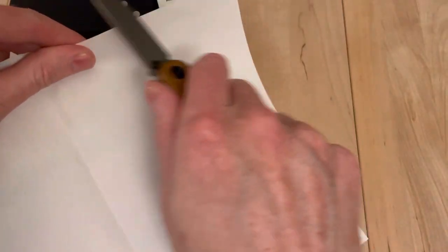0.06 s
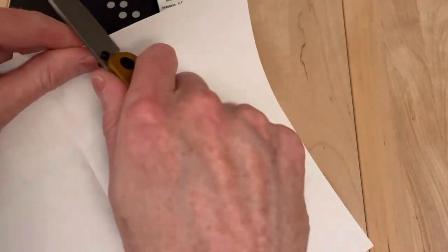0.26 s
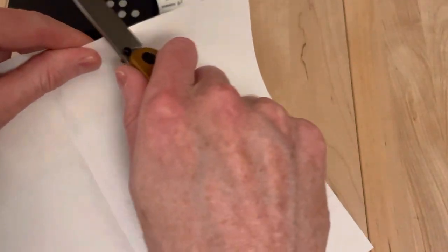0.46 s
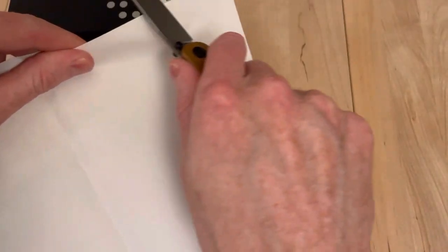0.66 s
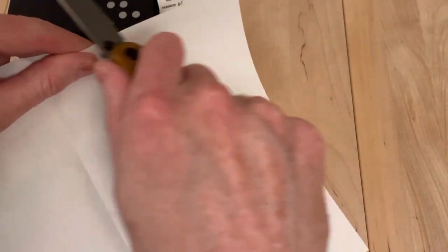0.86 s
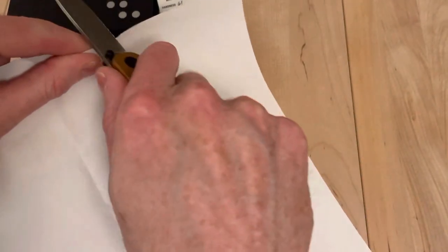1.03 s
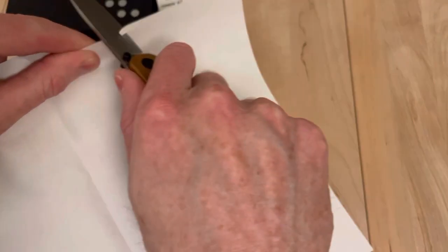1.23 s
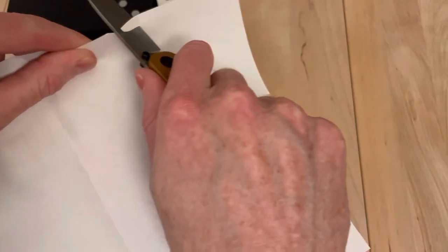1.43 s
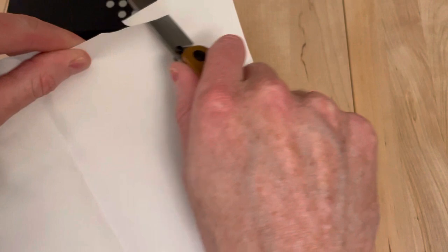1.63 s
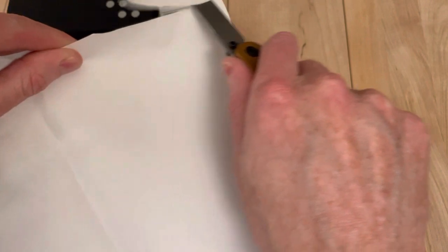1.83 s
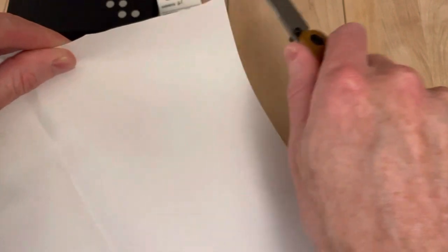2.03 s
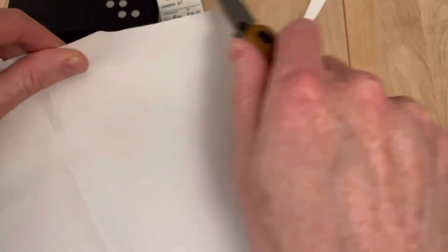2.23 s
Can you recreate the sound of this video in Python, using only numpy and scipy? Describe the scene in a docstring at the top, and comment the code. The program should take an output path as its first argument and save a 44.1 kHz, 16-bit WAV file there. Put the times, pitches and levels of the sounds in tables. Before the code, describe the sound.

A knife cuts a sheet of paper, close-miked in a small room. A crisp snap at once, then faint sliding and small rasps; a dry scraping cut from 0.4 to 0.7 seconds ends in a snap. Soft rustling and catches near 1.05 lead to a longer cut from 1.15, growing louder and brighter until sharp snaps at 1.89. Quiet sliding follows, with a last snap at 2.28. Low handling rumbles beneath.

```python
"""Close by, a hand-held sheet of paper snaps over a wooden table, then slides softly and rasps on a knife blade.
The blade drags one long cut, a snap ends it, and after slides and rasps it drags a longer, louder cut.
That ends in rasps and snaps; the sheet slides on to a last snap. Handling rumbles and pushes lie beneath.
Friction is shaped noise, snaps are struck resonances, rumble is low noise and pushes are sagging tones.
A small room answers the paper, and two microphone ports hear it out of step."""
import sys
import numpy as np
from scipy import signal
from scipy.fft import rfft, irfft, next_fast_len
from scipy.io import wavfile
from scipy.ndimage import uniform_filter1d, map_coordinates

SR = 44100
rng = np.random.default_rng(int(sys.argv[2]) if len(sys.argv) > 2 else 0)


def pcm_store(signal):
    """Save signal as 16-bit PCM."""
    levels = np.round(np.clip(np.atleast_2d(signal), -1, 1) * 32767)
    wavfile.write(sys.argv[1], SR, levels.astype(np.int16).T)


N = 100724

RISE_S = 0.00061  # linear onset of rubbing and rasps, s


def amp(db):
    """Level to amplitude: 20 dB is a factor of ten."""
    return 10 ** (np.asarray(db) / 20)


def unit(x):
    """Normalisation to an rms amplitude of 1."""
    return x / np.sqrt(np.mean(x ** 2) + 1e-20)


def along(points, hz):
    """Linear interpolation of (f/Hz, value) points on a logarithmic frequency axis."""
    f, v = np.transpose(points)
    return np.interp(np.log(hz + 1), np.log(f + 1), v)


def wobble(rate):
    """Slow random modulation: a smooth curve through rate random knots a second."""
    knots = rng.standard_normal(int(N * rate / SR) + 4)
    return map_coordinates(knots, [np.arange(N) * rate / SR])


def filtered(x, response):
    """Linear filtering: the spectrum of x times a complex frequency response."""
    m = next_fast_len(x.shape[-1] + 8192)
    spectrum = rfft(x, m) * response(np.fft.rfftfreq(m, 1 / SR))
    return irfft(spectrum, m)[..., :x.shape[-1]]


def peak(f, hz, width_hz):
    """Response of one damped, causal resonance, with gain 1 at its pitch."""
    return 1j * f * width_hz / (hz * hz - f * f + 1j * f * width_hz)


def patchy(x, depth_db, size, wide, long):
    """Random time-frequency modulation: a gain field smoothed over wide bins by long frames."""
    z = signal.stft(x, nperseg=size)[2]
    field = uniform_filter1d(rng.standard_normal(z.shape), size=wide, axis=0)
    field = uniform_filter1d(field, size=long, axis=1)
    return signal.istft(z * amp(depth_db * unit(field)), nperseg=size)[1][:N]


def thumps():
    """Handling as low-passed noise: hands on table and sheet, strongly correlated between the ports."""
    # handling level over time: t/s, level/dB
    handling = [(0.0, -48), (0.1, -59), (0.17, -71.5), (0.28, -66), (0.31, -49.5), (0.56, -52),
                (0.61, -56.5), (0.78, -57), (0.88, -79), (1.0, -70), (1.05, -49.5), (1.21, -55.5),
                (1.45, -62), (1.5, -58), (1.56, -71), (1.58, -53), (1.75, -94), (1.91, -51), (1.94, -53),
                (1.98, -55), (2.05, -65.5), (2.14, -69), (2.25, -65.5), (2.28, -58)]
    # spectral shape of the rumble: f/Hz, density/dB
    rumble = [(25, -38), (40, -10), (60, 0.5), (90, 1.5), (130, -8), (200, -6.5), (400, -7.5), (700, -41.5)]
    side_share, lumps_db, lumps_per_s = 0.35, 1, 26.2
    s, db = np.transpose(handling)
    mid, side = filtered(rng.standard_normal((2, N)), lambda f: amp(along(rumble, f)))
    pair = np.array([mid + side_share * side, mid - side_share * side])
    pair = unit(pair * amp(lumps_db * wobble(lumps_per_s)))
    return amp(np.interp(np.arange(N) / SR, s, db)) * pair


def pushes():
    """Soft pushes of the hand on sheet and table: gliding sinusoids under a raised-cosine swell."""
    # one push a row: centre t/s, length/s, peak level/dB, f/Hz at the centre
    push_table = [(.33, 0.045, -44, 90), (.775, 0.042, -49, 70), (1.052, 0.026, -40.5, 110),
                  (1.075, .05, -50, 65), (1.5, 0.043, -50.5, 80), (1.86, 0.025, -36, 230),
                  (1.896, .025, -37.5, 184), (1.922, 0.023, -39.5, 110), (1.98, 0.038, -41.5, 92),
                  (2.015, 0.027, -48.5, 100)]
    sag = 0.36  # fall in pitch from start to end, as a share of the centre pitch
    t, out = np.arange(N) / SR, np.zeros(N)
    for s, length, db, hz in push_table:
        u = np.clip((t - s) / length, -.5, .5)  # place within the push; the swell is zero at both ends
        turns = hz * length * (u - sag * u * u / 2) + rng.random()
        out += amp(db) * np.cos(np.pi * u) ** 2 * np.sin(2 * np.pi * turns)
    return out


def tail(t60s, seconds):
    """Diffuse reverberation: noise of energy 1 whose decay time depends on frequency."""
    hz, t, z = signal.stft(rng.standard_normal(int(SR * seconds)), SR, nperseg=128)
    decay = amp(-60 * t / along(t60s, hz)[:, None])
    h = signal.istft(z * decay, SR, nperseg=128)[1]
    return h / np.linalg.norm(h)


def room(paper):
    """Room response as convolution of the paper's sound with a delayed diffuse tail."""
    # reverberation time: f/Hz, t60/s
    decay_times = [(200, 0.41), (2000, 0.19), (10000, 0.24)]
    level_db, delay = -17, 300  # delay in samples
    return amp(level_db) * signal.fftconvolve(np.pad(paper, (delay, 0)), tail(decay_times, .4))[:N]


def sheet(f):
    """Radiation colour of the paper: a broad spectrum with the sheet's resonances and dips."""
    # broad spectrum of rubbed paper: f/Hz, density/dB
    colour = [(150, -19.5), (350, -10.5), (550, -4.5), (800, 4), (1300, 0), (2000, -2), (2350, -2),
              (2700, -8), (3100, -6), (4000, -9), (5000, -9), (6500, -10), (7700, -11.5), (10000, -15),
              (12000, -18.5), (14500, -13.5), (15800, -45)]
    # resonances of the sheet: f/Hz, width/Hz, level/dB (negative = dip)
    rings = [(821, 150, 3), (1360, 88, 1), (1730, 270, 1), (2270, 160, 2.5), (2294, 90, -14),
             (3027, 117, -9), (3840, 180, 3.5), (4290, 43, 7.5)]
    ringing = sum(db * np.abs(peak(f, hz, width)) ** 2 for hz, width, db in rings)
    return amp(along(colour, f) + ringing)


def fibres():
    """Friction noise: random fibre tears over smooth rubbing, in four bands; the two bodies sum to rms 1."""
    tears_per_s, spread_db, smooth_share = 9000, 1, 0.45  # smooth_share of the power
    chatter_db, patchy_db, streaks_db = 0.5, 1.78, 2.5
    low_hz, bite_hz, treble_hz = 1190, 3060, 6900  # band edges

    tears = (rng.random(N) < tears_per_s / SR) * rng.standard_normal(N)
    tears = tears * amp(spread_db * rng.standard_normal(N))
    smooth = rng.standard_normal(N)
    rub = np.sqrt(1 - smooth_share) * unit(tears) + np.sqrt(smooth_share) * smooth
    rub = patchy(rub, patchy_db, 256, 4, 8)
    rub = patchy(rub, streaks_db, 1024, 3, 12)
    rub = rub * amp(chatter_db * wobble(90))

    def split(f):
        lowpasses = [1 / (1 + (f / hz) ** 8) for hz in (low_hz, bite_hz, treble_hz)]
        # neighbouring low-passes differ by one band: low body, body, bite, treble
        return np.diff([0 * f] + lowpasses + [0 * f + 1], axis=0)

    bands = filtered(rub, lambda f: sheet(f) * split(f))
    return bands / (bands[0] + bands[1]).std()


def rubbing(strokes):
    """Continuous friction: steady fibre noise modulated by each stroke's level and colour."""
    t, gains = np.arange(N) / SR, np.zeros((4, N))
    for rows in strokes:
        s, level, low, bite, treble = np.transpose(rows)
        on = np.clip(np.minimum(t - s[0], s[-1] - t) / RISE_S + 1, 0, 1)
        gains += on * amp([np.interp(t, s, level + over) for over in (low, 0 * s, bite, treble)])
    return (gains * fibres()).sum(axis=0)


def slides():
    """Sliding friction of the sheet between the strokes of the blade."""
    # one list a slide: t/s, body level/dB, then low body/dB, bite/dB, treble/dB over that level
    slide_table = [
        [(0, -38, 5, 1, 1), (.012, -49.5, -6, -9, 4), (.025, -56, 8, -15, 0)],
        [(.05, -58.5, 9, 9, -2), (.13, -57, -8, 0.5, -1), (.2, -58.5, -6.5, -1.5, 0.5), (.245, -61, -5, -2, -1),
         (.262, -78, 5, 4, -7), (.284, -74, -3, -8, 0)],
        [(.29, -48.5, 2.5, 4, -1), (.342, -47.5, 3.5, 4.5, 1), (.405, -46, 5.5, 4, 0), (.425, -56, 9, -2, 5)],
        [(.71, -54, 6, 8, 6), (.77, -63, 11.5, 6.5, -3), (.83, -55.5, -11, -3.5, -3),
         (.91, -57.5, -12, 0.5, 0.5), (.97, -62, -3, -4, -3), (.995, -70, -8, -4, 0), (1.02, -84, -1, -3, -6)],
        [(1.03, -53, -9, -25, -3), (1.08, -54.5, 1, 9, 6), (1.14, -55, 10, 2, 10)],
        [(1.9, -41.5, 15, -1, -18), (1.93, -46.5, -4, 6, -11), (1.97, -53, 9, 5.5, -15),
         (2.03, -52.5, -20, -1.5, -13), (2.1, -64, 2, 2.5, 5.5), (2.15, -52.5, -5, 0, 8),
         (2.21, -53, -1.5, 7, 10), (2.278, -49.5, -13, 0.5, -7)],
    ]
    return rubbing(slide_table)


def snaps():
    """Impulsive release of the sheet: a blow and dying crackle excite resonances, with a bright crack."""
    # one snap a row: t/s, peak level of the body/dB, body f/Hz, crackle t60/s,
    # bite of the crack/dB before crack_db, thud/dB re body, thud f/Hz
    snap_table = [(0.0263, -27.5, 1390, 0.021, -21, 0.5, 780), (0.0341, -15.5, 1990, 0.033, -15, -10, 970),
                  (.0362, -14, 1810, 0.029, -4, -17, 402), (.0395, -24, 1004, 0.033, -17, -7.5, 490),
                  (.7174, -14.5, 1430, 0.012, -18, -7.5, 990), (.7195, -25.5, 1800, 0.043, -12, -3, 900),
                  (0.7378, -23, 2020, 0.041, -14, -8, 586), (0.742, -27.5, 1320, 0.041, -26, -5, 586),
                  (1.0242, -25, 760, 0.042, -1.5, -14.5, 350), (1.8876, -14, 1490, 0.01, 5, -20, 614),
                  (1.8928, -13, 1310, 0.029, 15, -7, 790), (1.8947, -8.5, 1390, 0.021, 7.5, -19.5, 437),
                  (1.949, -17.5, 1740, 0.038, -14, -18, 990), (2.2805, -11.5, 1880, 0.055, 8, -3, 840)]
    body_width, thud_width = 0.34, 0.77  # resonance width as a share of pitch
    crack_db, blow = -8, 10.2  # blow: height of the impulse against the crackle
    out, t = np.zeros(N + SR), np.arange(SR // 8) / SR
    for s, db, hz, t60, bite_db, thud_db, thud_hz in snap_table:
        decay = amp(-60 * t / t60) * np.clip(t / 0.0003, 0, 1)
        crackle = rng.standard_normal((2, len(t))) * decay
        pop = crackle[0] + blow * (np.arange(len(t)) == 8)
        body = filtered(pop, lambda f: peak(f, hz, body_width * hz) * peak(f, hz, 1.08 * hz))
        thud = filtered(pop, lambda f: peak(f, thud_hz, thud_width * thud_hz) ** 2)
        crack = filtered(crackle[1], lambda f: peak(f, 3840, 3500) ** 2)
        snap = body / np.abs(body).max()
        snap += amp(thud_db) * thud / np.abs(thud).max()
        snap += amp(bite_db + crack_db) * crack
        out[round(s * SR):][:len(t)] += amp(db) * snap
    return out[:N]


def rasps():
    """Catching of the blade: a brief burst of fibre noise reinforced by one resonance."""
    # one rasp a row: t/s, length before the decay/s, body level/dB, f/Hz, bite/dB and treble/dB over that level
    rasp_table = [(.2855, .008, -40, 720, -2, -12), (.318, .009, -45, 2050, -4, -8),
                  (.323, .008, -44, 850, -2, -4), (.348, .008, -45, 1700, -2, -8),
                  (.3615, .004, -32, 1620, -10, -14), (.382, .009, -36, 1400, -4, -9),
                  (.394, .008, -33.5, 1500, -6, -12), (.399, .01, -37, 2650, -3, -10),
                  (.606, .006, -35, 840, -6, -3), (.7385, .008, -35, 1450, 0, -12),
                  (.75, .006, -44, 750, -6, -15), (1.0225, .008, -44, 800, 3, -5),
                  (1.047, .01, -55, 885, 8, 3), (1.061, .008, -38, 870, 3, -1),
                  (1.0698, .004, -36, 1000, 4, 0), (1.088, .019, -44.5, 1420, -0.5, -1),
                  (1.133, .008, -45.5, 1500, -5, 4), (1.85, .003, -22, 1300, -15, -8),
                  (1.8562, .0015, -20, 1250, -12, -8), (1.868, .004, -22, 1100, -12, -8),
                  (1.8932, .0035, -16.5, 1400, -5, -10), (1.9447, .003, -33, 1800, -4, -10),
                  (1.9484, .001, -20, 1750, -12, -18)]
    fall_s, width, ring_db = 0.0017, 0.12, 4.5  # decay constant; width as a share of pitch; ring over noise
    out, t, bands = np.zeros(N), np.arange(SR // 10) / SR, fibres()
    for s, length, db, hz, bite_db, treble_db in rasp_table:
        start = round(s * SR)
        shape = np.clip(t / RISE_S, 0, 1) * np.exp(-np.clip(t - length, 0, None) / fall_s)
        low, body, bite, treble = bands[:, start:][:, :len(t)] * shape
        noise = low + body
        ring = unit(filtered(noise, lambda f: peak(f, hz, width * hz)))
        body = unit(unit(noise) + amp(ring_db) * ring) * shape.std()
        out[start:][:len(t)] += amp(db) * (body + amp(bite_db) * bite + amp(treble_db) * treble)
    return out


def climbing(x):
    """Moving resonance: a ring that mostly climbs as the blade travels along the edge."""
    # path of the ring: t/s, f/Hz, boost/dB (negative = dip)
    climb = [(.44, 2360, 0), (.5, 2520, 12.5), (.56, 2630, 8), (.6, 2700, 8), (1.15, 1480, 11.5),
             (1.3, 1460, 7), (1.55, 1720, -0.5), (1.7, 2070, 9), (1.77, 2580, 6), (1.83, 2870, 22),
             (1.89, 2900, -5)]
    width_hz = 150
    hz, t, z = signal.stft(x, SR, nperseg=512)
    s, ring_hz, db = np.transpose(climb)
    offset_hz = hz[:, None] - np.interp(t, s, ring_hz)
    near = 1 / (1 + (2 * offset_hz / width_hz) ** 2)
    return signal.istft(z * amp(np.interp(t, s, db) * near), SR, nperseg=512)[1][:N]


def cuts():
    """Cutting friction: two long drags of the blade, heard through the moving resonance."""
    # one list a cut, ahead of the moving ring: t/s, body level/dB,
    # then low body/dB, bite/dB, treble/dB over that level
    cut_table = [
        [(.424, -53, 0, 0, 1), (.43, -37, 5, 1, 0.5), (.47, -39, 4, 1.5, -2.5), (.51, -33, 1, -1, 3.5),
         (.555, -36, -1, 2, 4.5), (.58, -38, 1.5, 2.5, 4.5), (.62, -42, -1, 7.5, 6), (.677, -41, -3.5, 3, 1.5),
         (.69, -50, 7, 8, -3), (.708, -50.5, 1, 3, 2)],
        [(1.1435, -34.5, 5, 8, 8), (1.15, -39, 2, 7, 8.5), (1.22, -30, -9, 3.5, -4.5),
         (1.275, -36, -3.5, 3.5, 2.5), (1.3, -35, -5.5, 2.5, 0), (1.34, -36.5, -2.5, 4, 2),
         (1.374, -41.5, -0.5, -2, 1.5), (1.386, -34.5, 0.5, 7, 5.5), (1.47, -30, -2, -2, -0.5),
         (1.56, -27, -5.5, -0.5, -1), (1.64, -27, -0.5, 1.5, 2), (1.69, -21.5, -10, -3, -3),
         (1.76, -28.5, -3, 5, 2.5), (1.82, -22.5, -7.5, -4, 2), (1.855, -25.5, -0.5, -1, 2),
         (1.872, -26.5, -0.5, -1, 6), (1.886, -23.5, -3.5, 4, 11)],
    ]
    return climbing(rubbing(cut_table))


def ports(x):
    """Two-port reception: phase and level differences by frequency, plus an incoherent share."""
    # phase lead of the left port: f/Hz, lead/half turns (negative = lag)
    lead = [(100, .1), (350, .2), (800, .1), (1500, 0), (2600, -.2), (3900, -.05), (5200, -.3),
            (6100, -.55), (6900, -1), (8900, -1), (10300, -2), (12300, -2), (13700, -3), (16000, -3)]
    # level of left over right: f/Hz, level/dB
    lean = [(100, -.5), (350, -3.5), (800, 2), (1300, 0), (4000, -1), (5600, -6), (6800, 0), (16000, 0)]
    # sound that differs between the ports: f/Hz, amplitude over that of the source
    apart = [(100, 0.022), (400, 0.13), (900, 0.42), (1400, 0.18), (2200, 0.042), (3000, 0.73),
             (4000, 0.76), (5500, 0.83), (7000, 0.21), (10300, 0.067), (16000, 0.097)]
    z = signal.stft(x, nperseg=128)[2]
    # random phases keep the spectrum over time but break the likeness of the ports
    scrambled = z * np.exp(2j * np.pi * rng.random((2, *z.shape)))
    unlike = signal.istft(scrambled, nperseg=128)[1][:, :N]
    sign = np.array([[1], [-1]])  # left, right

    def port_response(f):
        return amp(sign * along(lean, f) / 2) * np.exp(sign * .5j * np.pi * along(lead, f))

    return filtered(x, port_response) + filtered(unlike, lambda f: along(apart, f))


def scene():
    """Superposition: paper and its room through the ports, over the handling."""
    paper = slides() + snaps() + rasps() + cuts()
    return ports(paper + room(paper)) + thumps() + pushes()


def record(dry):
    """Band limitation: the camera keeps nothing from 15.9 kHz up."""
    return filtered(dry, lambda hz: hz < 15900)


dry = scene()
out = record(dry)
pcm_store(out)
```